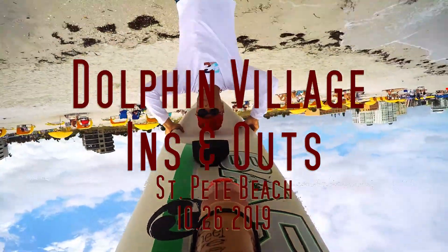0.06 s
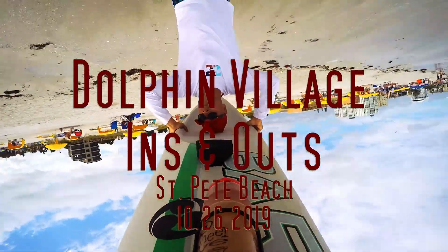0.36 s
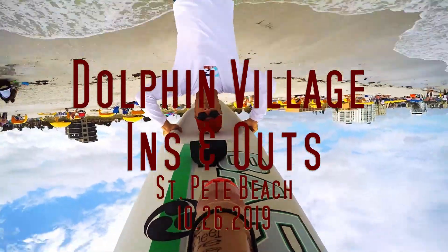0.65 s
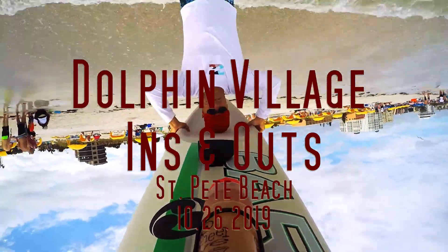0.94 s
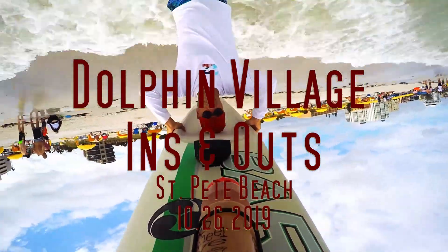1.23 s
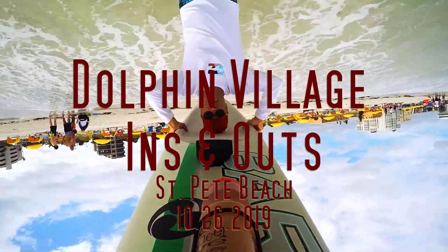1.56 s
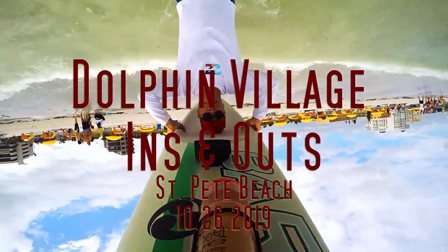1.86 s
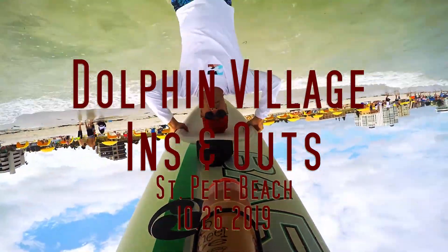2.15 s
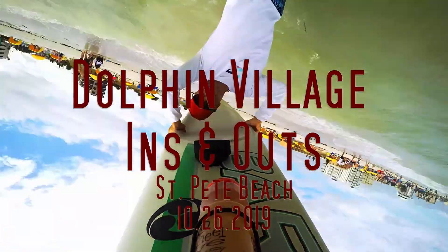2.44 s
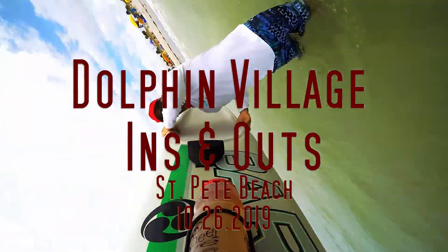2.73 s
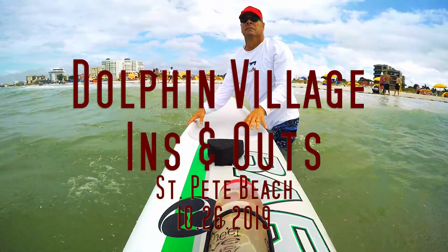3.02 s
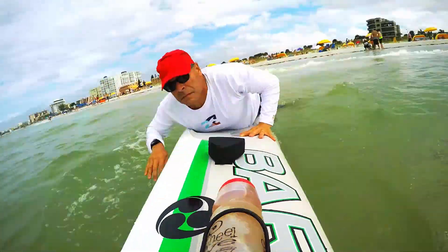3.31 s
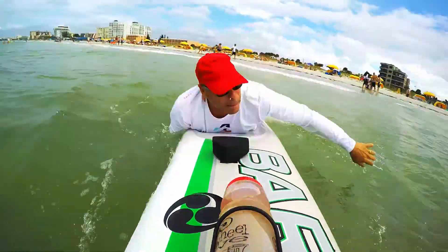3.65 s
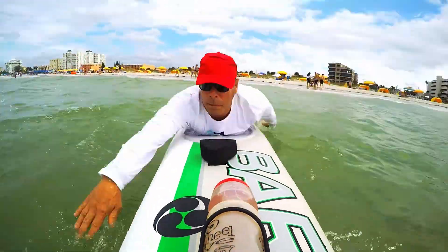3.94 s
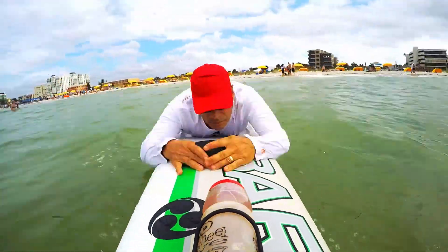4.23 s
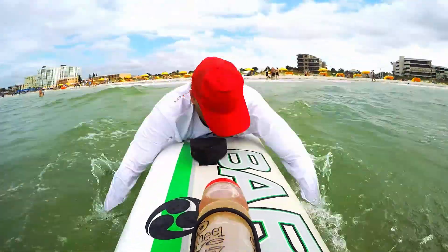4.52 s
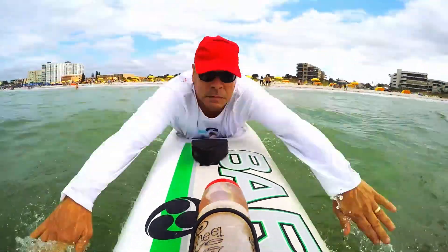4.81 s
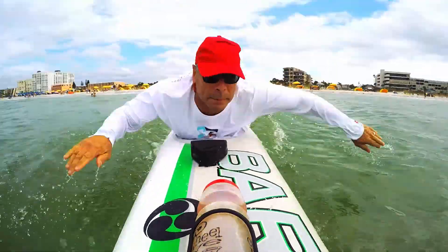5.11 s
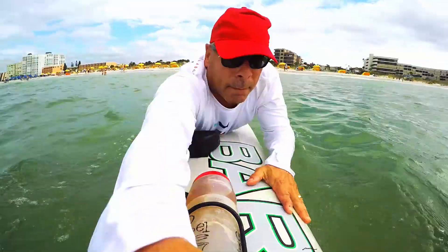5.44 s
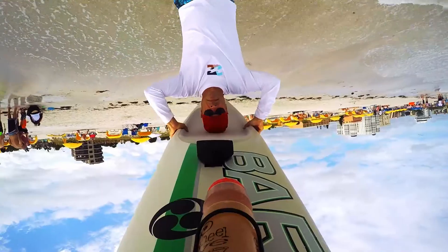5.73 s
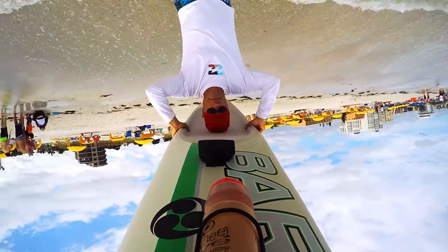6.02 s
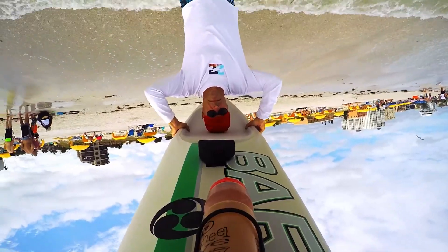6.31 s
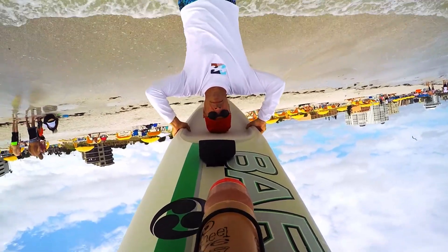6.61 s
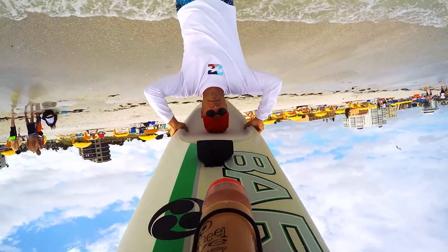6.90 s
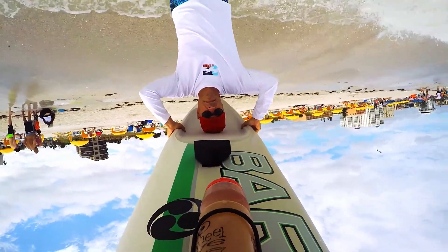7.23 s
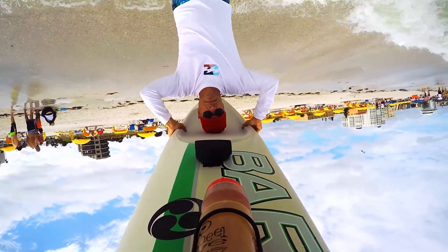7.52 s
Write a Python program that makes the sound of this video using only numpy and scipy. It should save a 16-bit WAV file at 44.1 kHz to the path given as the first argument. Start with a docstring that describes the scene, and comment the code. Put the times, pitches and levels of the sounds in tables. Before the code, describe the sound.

Small waves lap softly, water splashes and gurgles around a booming hollow paddleboard, and breaking surf roars in close.

```python
"""A beach, heard from a waterproof case on the deck of a paddleboard. Three scenes cut one into the next:
gentle wash on the sand, quick paddling splashes, then loud surf rushing in.
The water is bubbles: clouds of them roar and hiss, single ones ring, and the case colours wash and splash.
Drops tick on the case, the hollow board hums and booms when bumped, and wind and waves rumble below."""
import sys
import numpy as np
from scipy import signal
from scipy.fft import rfft, irfft, next_fast_len
from scipy.io import wavfile
from scipy.ndimage import uniform_filter1d

SR = 44100
rng = np.random.default_rng(int(sys.argv[2]) if len(sys.argv) > 2 else 0)


def master_out(mix):
    """Clip the mix to full scale and print it as 16-bit PCM to the path in sys.argv[1]."""
    frames = np.transpose(np.atleast_2d(mix))
    ceiling = np.clip(frames, -1, 1)
    pcm = np.round(ceiling * 32767).astype(np.int16)
    wavfile.write(sys.argv[1], SR, pcm)


N = 342348
TIME = np.arange(N) / SR
PADDLE_START, PADDLE_END = 2.85, 5.53  # seconds: the cuts from wash to paddling to surf

# Wavelets running up the sand. Each row: start in seconds, level in dB, rise, hold and drain in seconds,
# then foam hiss and board hum in dB against that level.
WAVELETS = [(-.1, -51, 0.13, 0.2, 0.18, -19.5, 3.5), (.825, -50.5, 0.026, 0.049, 0.2, -22, -7),
            (1.008, -44, 0.051, 0.13, 0.063, -17, 2), (1.68, -49.5, 0.12, 0.093, 0.13, -27, -3),
            (2.343, -50, 0.019, 0.015, 0.047, -19, -2), (2.47, -55.5, 0.031, 0.063, 0.31, -43, 5.5)]
# Breaking waves. Each row reads like a wavelet's.
BREAKERS = [(5.46, -35.5, 0.094, 0.27, 0.27, -25, -27), (6.555, -28.5, 0.13, 0.26, 1, -11, -4.5),
            (6.59, -35.5, 0.088, .004, 0.03, -3.5, -20), (6.9, -24.5, 0.5, 0.13, 0.27, -18.5, -7)]
# Hands and chop throwing water. Each row: start in seconds, relative level in dB, hold in seconds,
# brightness in dB.
SPLASHES = [(2.85, -47, 0.06, -2.5), (2.947, -41.5, 0.001, 2), (3.02, -45, 0.0075, 4),
            (3.112, -45, 0.087, 4), (3.36, -44.5, 0.015, 5.5), (3.615, -36.5, 0.0063, 6.5),
            (3.667, -49.5, 0.034, 9), (3.733, -45.5, 0.018, 7), (3.848, -38.5, 0.0075, 6),
            (3.933, -32.5, 0.00088, -9), (4.01, -45.5, 0.0037, 3), (4.056, -45.5, 0.008, 8),
            (4.117, -41.5, 0.0097, -1), (4.181, -47, 0.0088, 5), (4.263, -41, 0.0056, 0),
            (4.305, -44, 0.05, 1.5), (4.379, -39.5, 0.036, 5.5), (4.426, -35, 0.0099, 2),
            (4.513, -36, 0.0056, -6), (4.583, -46.5, 0.017, 11.5), (4.65, -45.5, 0.0045, 3),
            (4.734, -38, 0.061, 2), (4.808, -44, 0.042, 6), (4.911, -41.5, 0.033, 6),
            (5.026, -36.5, 0.018, 8.5), (5.062, -37, 0.052, -1.5), (5.208, -37.5, 0.015, -2),
            (5.245, -45, 0.056, 7), (5.356, -43, 0.0059, 2), (5.384, -45, 0.014, 8), (5.458, -38, 0.016, 4)]
# Fine spray reaching the case. Each row: start in seconds, level in dB, swell time in seconds.
SPRAYS = [(3.624, -64.5, 0.0071), (4.743, -57, .012), (5.027, -55.5, 0.014)]
# Drops striking the case. Each row: peak time in seconds, relative level in dB, treble in dB.
DROPS = [(0.2643, -48.5, 10), (1.927, -62, 15), (2.7295, -58, 11), (3.2526, -24, 3), (3.2895, -34, 2),
         (3.2992, -29.5, 5), (3.312, -36.5, 5), (3.3222, -35, 4), (3.44, -29.5, -2), (3.461, -37, -16),
         (3.475, -35.5, -24), (3.483, -37, -20), (3.4972, -41, -27), (3.5442, -41, -24),
         (3.953, -35.5, -2.5), (4.7175, -48.5, 3), (4.7615, -44, 14), (5.215, -43.5, 5)]
# Pockets of trapped air. Each row: start in seconds, level in dB, swell time in seconds,
# starting pitch in Hz, fuzz from 0 (one bubble) to 1 (a cloud).
GULPS = [(2.465, -36.5, 0.0048, 1240, 0.63), (2.87, -48, 0.013, 710, 0.77), (3.037, -40.5, 0.0094, 616, 1),
         (3.122, -41.5, 0.017, 2176, 0.88), (3.948, -27, 0.004, 524, 0.2),
         (4.322, -40.5, 0.0075, 1220, 0.16), (4.762, -38.5, 0.0089, 732, 0.25),
         (4.993, -44, 0.0038, 1070, 0.46), (5.217, -31.5, 0.0043, 728, 0.2), (5.31, -32, 0.01, 1644, 0.31),
         (5.393, -43, 0.0054, 2380, 0.47), (6.66, -32.5, 0.041, 619, .9), (7.22, -32, 0.072, 1896, 1),
         (7.7, -31.5, 0.029, 625, 0.83)]
# Body and water knocking the board. Each row: peak time in seconds, relative level in dB, swell in seconds.
BUMPS = [(.068, -39.5, 0.018), (.35, -49, 0.014), (.949, -44, 0.01), (1.741, -41, 0.0092),
         (2.395, -42, 0.011), (2.481, -36.5, 0.01), (2.902, -36.5, 0.011), (2.973, -30, .011),
         (3.015, -31, 0.012), (3.042, -28, 0.0072), (3.077, -31, 0.016), (3.179, -35.5, 0.026),
         (3.239, -29.5, 0.0093), (3.639, -29, 0.01), (3.87, -28.5, 0.011), (3.96, -26.5, 0.0063),
         (4.339, -35, 0.013), (4.433, -28.5, 0.016), (5.09, -35.5, 0.016), (5.125, -30.5, 0.0094),
         (6.074, -24.5, 0.02), (6.136, -32, 0.05), (6.565, -35.5, 0.02), (6.802, -26.5, 0.027),
         (7.03, -25.5, 0.044), (7.119, -23.5, 0.014), (7.265, -23.5, 0.033), (7.42, -29.5, 0.022)]
# Hard slaps on the hull. Each row: centre time in seconds, peak level in dB, pulse width in seconds.
SLAPS = [(3.9549, -22.5, 0.00066), (5.526, -24, 0.00088), (6.057, -31, 0.0023)]
# The board lurching in the water. Each row: start in seconds, level in dB, hold in seconds.
LURCHES = [(2.95, -41, 0.4), (3.456, -37, 0.29), (4.25, -44.5, 0.45), (5.278, -39.5, 0.43)]
# Resonances of the case. Each row: centre in Hz, width in Hz, boost or cut in dB.
CASE_RESONANCES = [(581.3, 71, 10.5), (699.6, 41, 8), (789, 43, 6.5), (956, 187, -6), (1190, 172, 8),
                   (1333, 71, 6), (1479, 32, -4.5), (1527, 82, 6.5), (1703, 210, 3.5), (1866, 60, -6.5),
                   (1920, 49, 4.5), (4580, 85, 4), (6150, 480, 4), (6670, 360, 6.5), (8720, 400, 3),
                   (9550, 380, -6)]
# Where the treble sounds wide and phasey. Each row: start and end in seconds, lower edge in Hz.
WIDE_STRETCHES = [(0, PADDLE_START, 1410), (PADDLE_START, PADDLE_END, 470)]
# EQ curves for the low rumble, the board's hum, a bump's thud, drops and spray, splashes and surf.
# Each row: frequency in Hz, gain in dB.
RUMBLE_EQ = [(10, 5.5), (45, -1.5), (100, -16), (4500, -100)]
HUM_EQ = [(60, -20), (130, -16.5), (165, -12), (188, 8.5), (210, 8.5), (235, -15), (300, -20.5),
          (900, -100)]
THUD_EQ = [(40, 0), (100, 2.5), (170, 3), (600, -17.5), (2600, -100)]
DROP_EQ = [(300, -10.5), (900, -4.5), (1900, 0.5), (3400, -1.5), (4500, -9.5), (6000, -13.5), (7500, -23),
           (15000, -37.5)]
SPLASH_EQ = [(120, -0.5), (400, -8.5), (700, -7.5), (1300, -2), (2350, -4.5), (3000, -14.5), (4200, -20),
             (5600, -24.5), (6300, -39.5), (7800, -41), (10000, -45.5), (15000, -61)]
SURF_EQ = [(100, -34), (300, -9.5), (450, -20), (600, -10), (950, -5.5), (1250, -2.5), (1700, -8.5),
           (2200, -11.5), (3600, -19.5), (5000, -30.5), (7200, -39), (11000, -41.5), (15000, -53)]


def amp(db):
    """Decibels to gain."""
    return 10 ** (np.asarray(db) / 20)


def unit(x):
    """Scales to an rms of one."""
    return x / np.sqrt(np.mean(x ** 2) + 1e-20)


def match_energy(sound, envelope):
    """Gives a hit the same energy as its envelope."""
    return sound * np.linalg.norm(envelope) / np.linalg.norm(sound)


def add(mix, start_s, sound):
    """Lays a sound into the mix, trimming any overhang."""
    start = round(start_s * SR)
    sound = sound[max(-start, 0):]
    part = mix[max(start, 0):][:len(sound)]
    part += sound[:len(part)]


def during(start, end):
    """A gate, open from start to end, with short fades."""
    return uniform_filter1d(((TIME >= start) & (TIME < end)) * 1., size=200)


def curve_db(curve, hz):
    """An EQ curve's gain at the given frequencies, joined on a log axis."""
    knots_hz, db = np.transpose(curve)
    return np.interp(np.log(hz + 1), np.log(knots_hz), db)


def equalise(x, curve, extra_db=lambda hz: 0):
    """Filters by an EQ curve, with an optional second one on top."""
    n = next_fast_len(len(x))
    hz = np.fft.rfftfreq(n, 1 / SR)
    return irfft(rfft(x, n) * amp(curve_db(curve, hz) + extra_db(hz)), n)[:len(x)]


def case_db(hz):
    """The boxy peaks and dips that the case puts on the water outside."""
    return sum(db * np.exp(-2 * np.minimum(((hz - centre) / width) ** 2, 20))
               for centre, width, db in CASE_RESONANCES)


def wander(n, rate):
    """Random modulation that finds a new value rate times a second."""
    knots = rng.standard_normal(4096)
    return np.interp(np.arange(n) / SR * rate, np.arange(len(knots)), knots)


def swell(rise):
    """Time axis and envelope of a push that peaks after rise seconds, then dies away."""
    u = np.arange(0, 6, 1 / (SR * rise))
    return np.arange(len(u)) / SR, (u * np.exp(1 - u)) ** 2


def surge(t, rise, hold, drain):
    """Envelope of moving water: it builds smoothly, holds, then drains away."""
    u = np.clip(t / rise, 0, 1)
    return u * u * (3 - 2 * u) * np.exp(-np.clip((t - rise - hold) / drain, 0, 20))


def splash_envelope(t, hold):
    """A quick throw of water, then a faint tail as it spatters back."""
    throw = surge(t, rise=0.018, hold=hold, drain=0.0084)
    spatter = amp(-31.5) * surge(t, rise=0.018, hold=hold, drain=0.06)
    return np.maximum(throw, spatter)


def crackle(n, per_s, spread_db):
    """Clicks of bursting bubbles, mostly small, a few large."""
    size = amp(spread_db * np.minimum(rng.exponential(1, n), 4))
    return unit(size * rng.standard_normal(n) * (rng.random(n) < per_s / SR))


def churn(x, patchy_db):
    """Clouds of bubbles make patches of the spectrum come and go."""
    spectra = signal.stft(x, nperseg=512)[2]
    patches = uniform_filter1d(rng.standard_normal(spectra.shape), size=5, axis=0)
    patches = unit(uniform_filter1d(patches, size=5, axis=1))
    return signal.istft(spectra * amp(patchy_db * patches), nperseg=512)[1][:len(x)]


def bubbles(n, per_s, spread_db, decay_cycles=7, glide=0.02):
    """Scattered bubbles, each starting softly and ringing with a slight upward bend."""
    out, t = np.zeros(n), np.arange(2500) / SR
    for place, pitch, size in rng.random((200, 3))[:int(per_s * n / SR) + 1]:
        hz = 650 * 2 ** (2.9 * pitch)
        cycles = hz * t[hz * t < 6 * decay_cycles]
        age = cycles / decay_cycles
        envelope = np.exp(-age) * (1 - np.exp(-cycles / 2))
        ring = np.sin(2 * np.pi * cycles * (1 + glide * np.minimum(age, 2)))
        add(out, place * n / SR, amp(spread_db * size) * envelope * ring)
    return unit(out)


def rumble(wave_push, calm_db, afloat_db, wave_db, gust_db):
    """The low bed: lumpy pressure from wind, waves and the lurching board."""
    bed = amp(calm_db) + during(PADDLE_START, PADDLE_END) * amp(afloat_db)
    bed += during(PADDLE_END, np.inf) * wave_push * amp(wave_db)
    lurch_power = sum((amp(db) * surge(TIME - start, rise=0.052, hold=hold, drain=0.13)) ** 2
                      for start, db, hold in LURCHES)
    gusts = amp(gust_db * wander(N, rate=3.936))
    return np.sqrt(bed ** 2 + lurch_power) * gusts * unit(equalise(rng.standard_normal(N), RUMBLE_EQ))


def board_hum(wave_push, afloat_db, splash_db, throb_db):
    """Waves and splashes keep the hollow board humming and throbbing."""
    drive = wave_push + during(PADDLE_START, PADDLE_END) * amp(afloat_db)
    for start, db, hold, _ in SPLASHES:
        add(drive, start, amp(db + splash_db) * splash_envelope(TIME[:SR // 2], hold))
    hum = unit(equalise(rng.standard_normal(N), HUM_EQ))
    beating = np.sqrt(uniform_filter1d(hum ** 2, size=1500) + .05)
    compressed = unit(hum / np.sqrt(beating))
    return drive * compressed * amp(throb_db * wander(N, rate=14))


def lapping(level_db, build_db):
    """Small ripples bubble along the rails, building as the board gathers speed."""
    ripples = unit(churn(rng.standard_normal(N), patchy_db=2.4) * amp(1.8 * wander(N, rate=45)))
    for start in np.arange(PADDLE_START, PADDLE_END, .5):
        add(ripples, start, .24 * bubbles(SR // 2, per_s=200, spread_db=13))
    speed = np.clip((TIME - PADDLE_START) / (PADDLE_END - PADDLE_START), 0, 1)
    return amp(level_db + build_db * speed) * unit(equalise(ripples, SPLASH_EQ, case_db))


def sprays():
    """Fine spray reaches the case as a crisp, airy spit."""
    out = np.zeros(N)
    air_eq = [(2500, -26), (8300, -5), (15000, -18)]
    for start, db, rise in SPRAYS:
        t, envelope = swell(rise)
        mist = equalise(rng.standard_normal(len(t)), DROP_EQ, lambda hz: curve_db(air_eq, hz))
        add(out, start, amp(db) * envelope * unit(mist))
    return out


def drops(trim_db, fade_s, crack_db):
    """Drops burst on the case: a short bright patter with a sharp crack at its peak."""
    out, t = np.zeros(N), np.arange(-1024, 1024) / SR
    envelope = np.exp(-abs(t) / fade_s) + amp(crack_db) * np.exp(-10 * abs(t) / fade_s)
    for peak, db, treble_db in DROPS:
        burst = envelope * rng.standard_normal(len(t))
        tick = equalise(burst, DROP_EQ, lambda hz: curve_db([(3500, 0), (10000, treble_db)], hz))
        add(out, peak + t[0], amp(db + trim_db) * match_energy(tick, envelope))
    return out


def gulps(glide_per_s, scatter):
    """Trapped air rings and bends up as it nears the surface; many like bubbles blur into a gurgle."""
    out = np.zeros(N)
    for start, db, rise, hz, fuzz in GULPS:
        t, envelope = swell(rise)
        spread_hz = hz * fuzz * scatter
        cloud = 1 - fuzz + fuzz * (wander(len(t), spread_hz) + 1j * wander(len(t), spread_hz))
        clumps = amp(3 * fuzz * wander(len(t), rate=220))
        chirp = np.exp(2j * np.pi * hz * t * (1 + glide_per_s * t / 2))
        ring = envelope * (clumps * cloud * chirp).real
        add(out, start, amp(db) * match_energy(ring, envelope))
    return out


def board_bumps(trim_db, thud_db, mode_hz, pitch_scatter_hz, fade_ratio):
    """Soft knocks thud and make the board boom, each boom at a slightly different, random pitch."""
    out = np.zeros(N)
    thud_noise = amp(thud_db) * unit(equalise(rng.standard_normal(N), THUD_EQ))
    for peak, db, rise in BUMPS:
        hz = mode_hz + pitch_scatter_hz * rng.uniform(-1, 1)
        t = np.arange(-3 * rise, 5 * rise, 1 / SR)
        envelope = np.exp(-(t / np.where(t < 0, rise, rise * fade_ratio)) ** 2)
        boom = np.sqrt(2) * np.sin(2 * np.pi * hz * t + .25 * wander(len(t), rate=100))
        thud = thud_noise[round(peak * SR):][:len(t)]
        add(out, peak + t[0], amp(db + trim_db) * envelope * (boom + thud))
    return out


def hull_slaps():
    """A hard slap on the hull is a single pull and push of pressure."""
    out = np.zeros(N)
    for centre, db, width in SLAPS:
        u = np.arange(-4, 4, 1 / (SR * width))
        add(out, centre + u[0] * width, amp(db) * u * np.exp((1 - u ** 2) / 2))
    return out


def splashes(trim_db):
    """Hands and chop throw water: each splash is a burst of churning spray and ringing bubbles."""
    out, n = np.zeros(N), SR // 5
    for start, db, hold, bright_db in SPLASHES:
        envelope = splash_envelope(TIME[:n], hold)
        spray = unit(churn(rng.standard_normal(n), patchy_db=2.2))
        ringing = .4 * bubbles(n, per_s=800, spread_db=15)
        presence = [(1500, 0.026), (4000, bright_db), (9000, bright_db * 0.37)]
        water = equalise(spray + ringing, SPLASH_EQ, lambda hz: case_db(hz) + curve_db(presence, hz))
        add(out, start, amp(db + trim_db) * match_energy(envelope * water, envelope))
    return out


def wave_envelopes(waves, sea_db, sea_hiss_db, sea_hum_db, push_share):
    """Envelopes of roar, foam hiss and push on the board, as waves pile on the steady sea."""
    roar, hiss, push = np.ones((3, N)) * amp([[sea_db], [sea_hiss_db], [sea_hum_db]]) ** 2
    for start, db, rise, hold, drain, hiss_db, hum_db in waves:
        t = TIME - start
        roar += (amp(db) * surge(t, rise, hold, drain)) ** 2
        # Foam hisses just ahead of the roar and lets go sooner.
        hiss += (amp(db + hiss_db) * surge(t + 0.013, rise * 0.95, hold * 0.78, drain)) ** 2
        push_rise = rise * push_share  # the wave's front meets the board before the roar peaks
        push += (amp(db + hum_db) * surge(t, push_rise, hold + push_rise / 2, drain * 0.87)) ** 2
    return np.sqrt([roar, hiss, push])


def surf(roar_level, hiss_level, tilt_db_per_octave, patchy_db, flutter_db):
    """Countless bubbles make a roar, topped by the hiss of fresh foam."""
    fizz = churn(crackle(N, per_s=30000, spread_db=2.5), patchy_db)
    foam = equalise(fizz, SURF_EQ,
                    lambda hz: case_db(hz) + tilt_db_per_octave * np.log2(np.clip(hz, 400, 4000)))
    hiss = signal.sosfiltfilt(signal.butter(3, 3500, "high", fs=SR, output="sos"), foam)
    body = unit(foam - hiss)
    deep = signal.sosfiltfilt(signal.butter(2, 900, fs=SR, output="sos"), body)
    deep_level = np.interp(TIME - 0.026, TIME, roar_level)  # big, deep bubbles form later
    flutter = amp(flutter_db * wander(N, rate=45))
    return (roar_level * (body - deep) + deep_level * deep + hiss_level * unit(hiss)) * flutter


def hollow_out(wash, band_hz, until_s):
    """A notch makes the opening wash sound hollow."""
    band = signal.sosfiltfilt(signal.butter(2, band_hz, "band", fs=SR, output="sos"), wash)
    return wash - during(0, until_s) * band


def widen(x, width):
    """A quarter-cycle-shifted copy of the treble, opposite in each ear, spreads it wide."""
    n = next_fast_len(N)
    hz, shifted = np.fft.rfftfreq(n, 1 / SR), 1j * rfft(x, n)
    side = width * sum(during(start, end) * irfft(shifted / (1 + (edge_hz / (hz + 1)) ** 12), n)[:N]
                       for start, end, edge_hz in WIDE_STRETCHES)
    return np.array([x - side, x + side])


def scene():
    """Wash, paddling and breakers in turn, with the board sounding under all of them."""
    wash_roar, wash_hiss, wash_push = during(0, PADDLE_START) * wave_envelopes(
        WAVELETS, sea_db=-63.5, sea_hiss_db=-80.0, sea_hum_db=-68.0, push_share=0.6)
    breaker_roar, breaker_hiss, breaker_push = during(PADDLE_END, np.inf) * wave_envelopes(
        BREAKERS, sea_db=-39, sea_hiss_db=-54.0, sea_hum_db=-41.5, push_share=0.76)
    wash = surf(wash_roar, wash_hiss, tilt_db_per_octave=-2.5, patchy_db=2.0, flutter_db=2.07)
    water = hollow_out(wash, band_hz=(1920, 2200), until_s=0.55)
    water += during(PADDLE_START, PADDLE_END) * lapping(level_db=-60.0, build_db=11.5)
    water += surf(breaker_roar, breaker_hiss, tilt_db_per_octave=0.4, patchy_db=1.54, flutter_db=0.47)
    water += splashes(trim_db=0.5)
    water += drops(trim_db=-2.5, fade_s=0.0027, crack_db=-4) + sprays()
    water += gulps(glide_per_s=0.75, scatter=0.34)
    hull = board_bumps(trim_db=2.5, thud_db=-13, mode_hz=201.3, pitch_scatter_hz=6.5, fade_ratio=1.52)
    hull += hull_slaps()
    hull += board_hum(wash_push + breaker_push, afloat_db=-53.5, splash_db=-6.5, throb_db=1.3)
    hull += rumble(breaker_push, calm_db=-58.5, afloat_db=-62.5, wave_db=-22, gust_db=1.0)
    return widen(water + hull, width=1.3)


def record(dry):
    """A steep low-pass shaves off the very top."""
    low_pass = signal.firwin(511, cutoff=15400, window=("kaiser", 9), fs=SR)
    return signal.oaconvolve(dry, low_pass[None], "same")


dry = scene()
out = record(dry)
master_out(out)
```